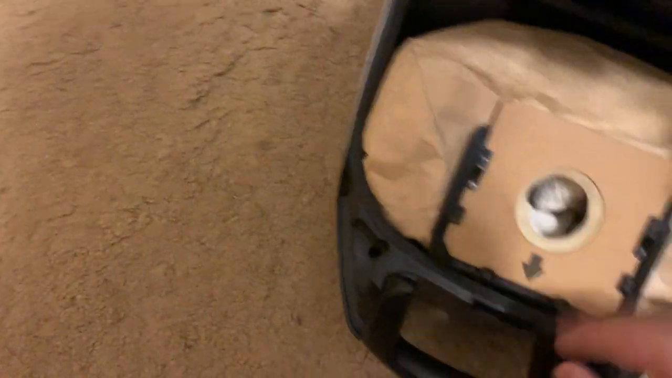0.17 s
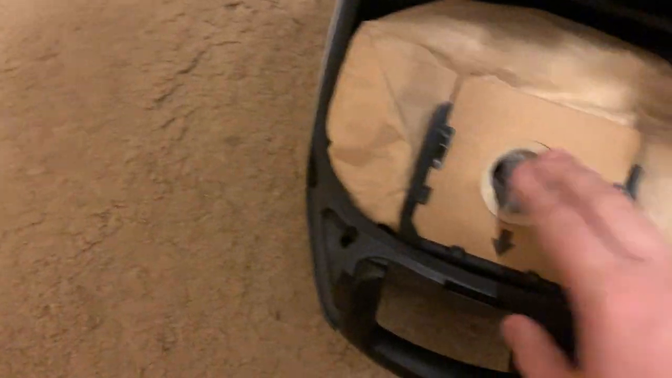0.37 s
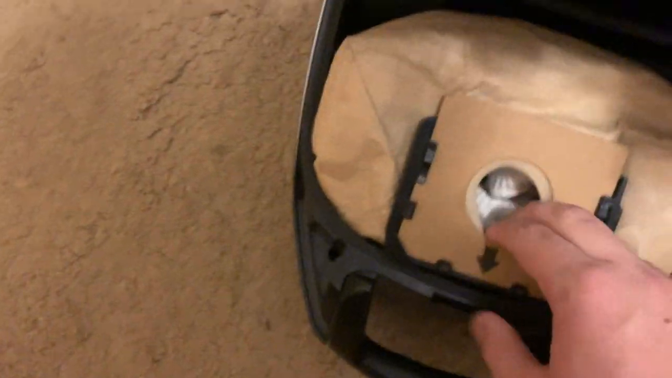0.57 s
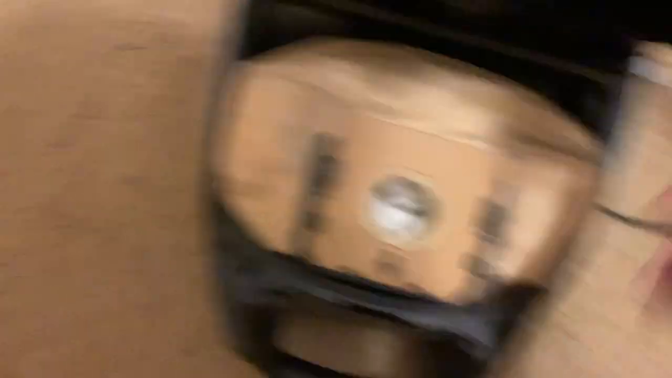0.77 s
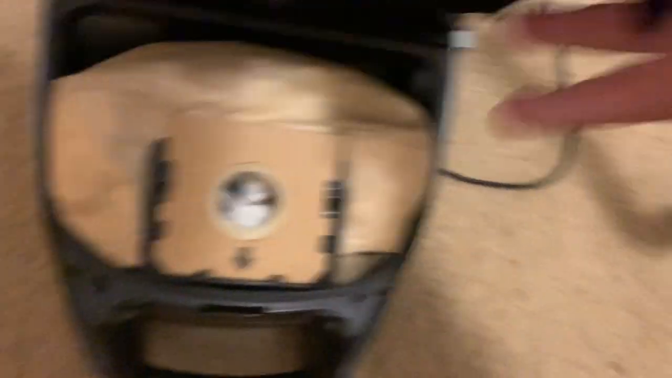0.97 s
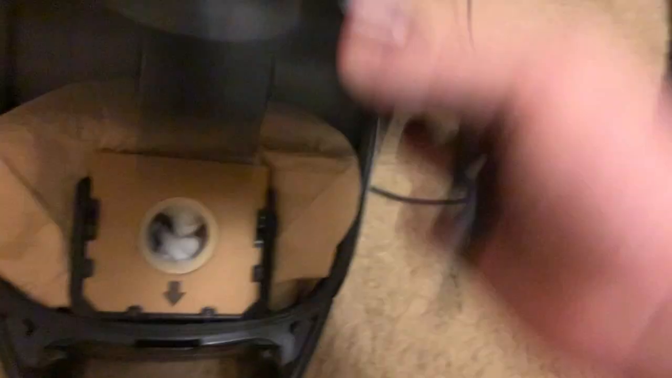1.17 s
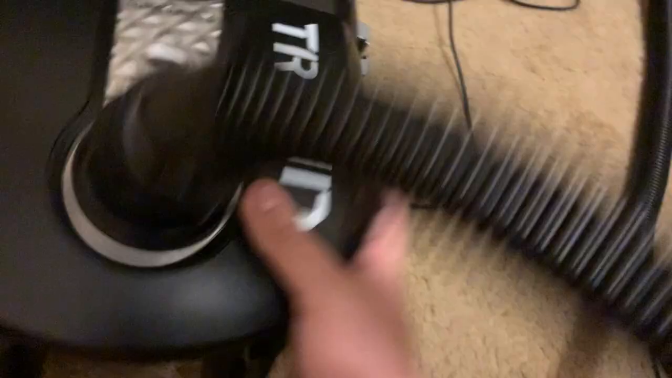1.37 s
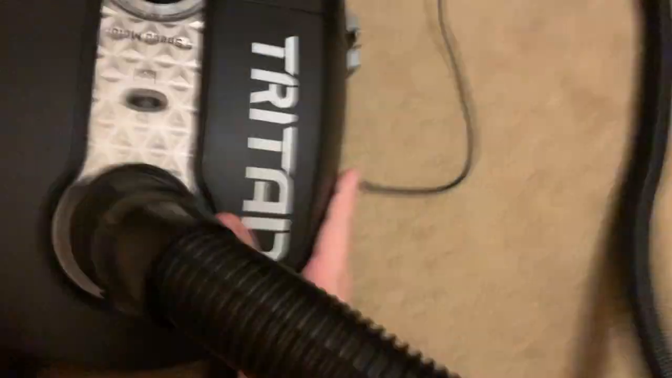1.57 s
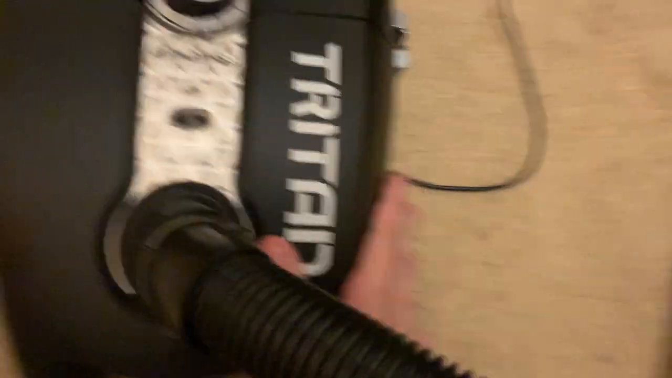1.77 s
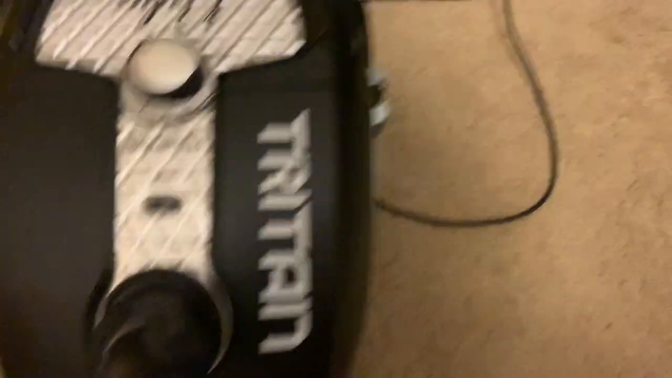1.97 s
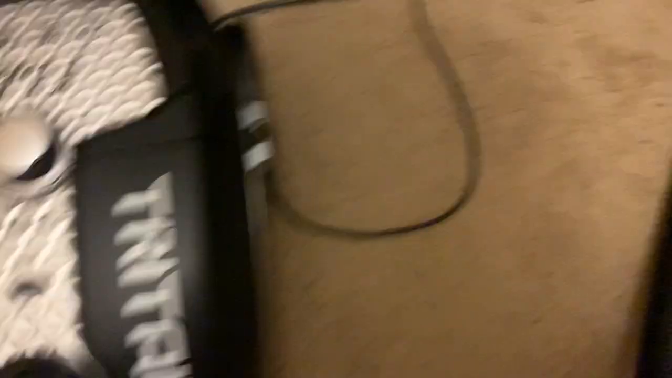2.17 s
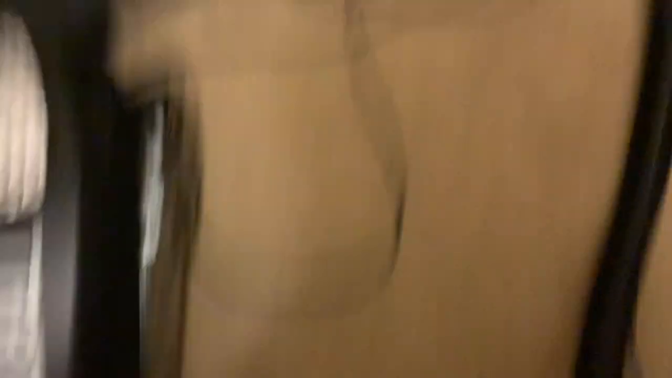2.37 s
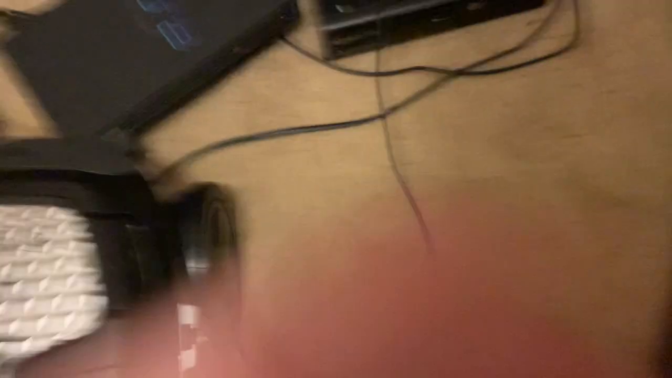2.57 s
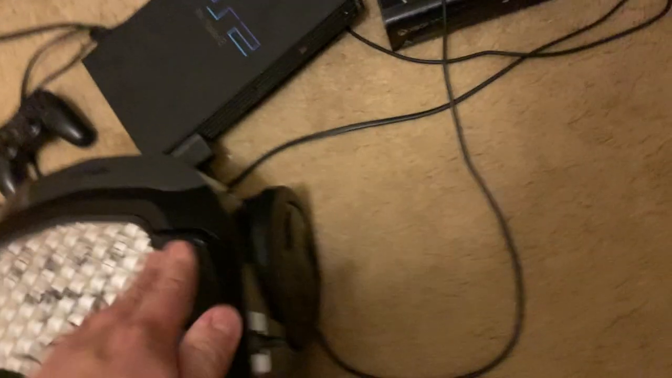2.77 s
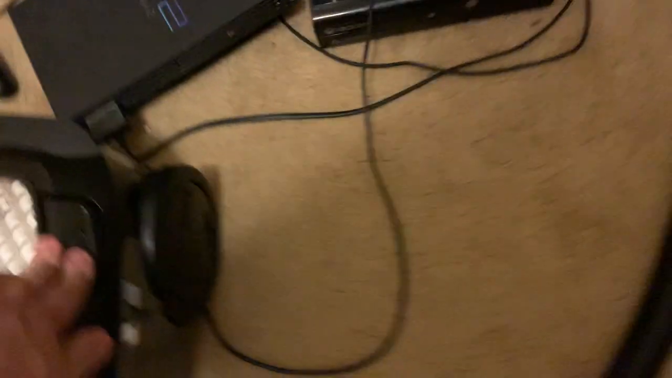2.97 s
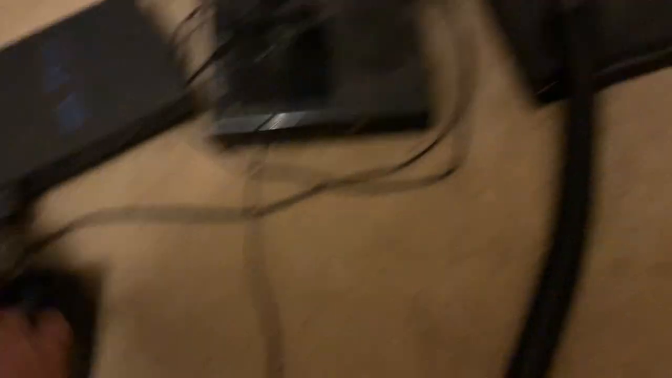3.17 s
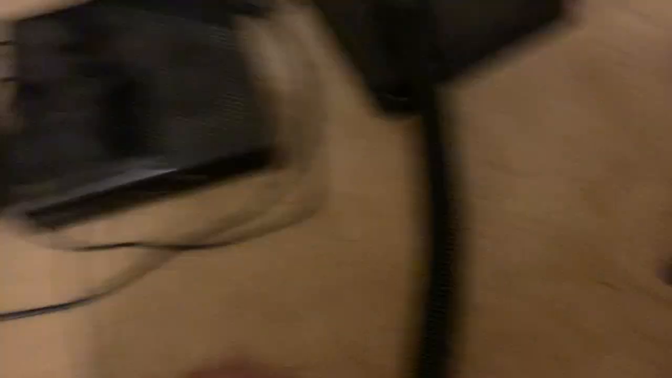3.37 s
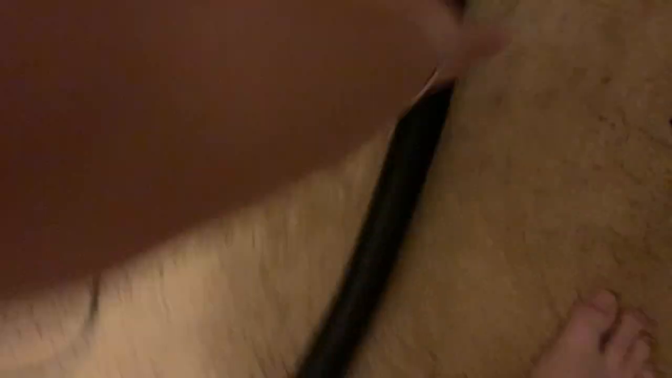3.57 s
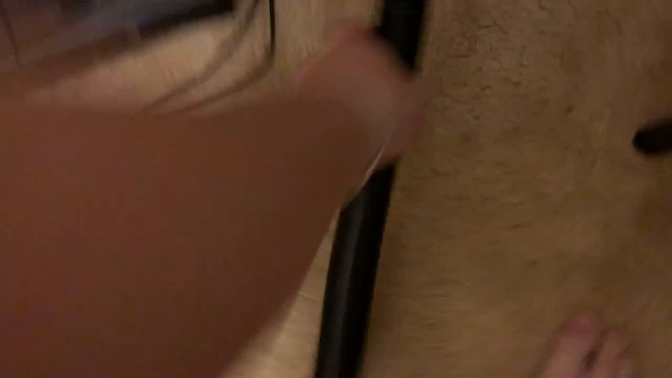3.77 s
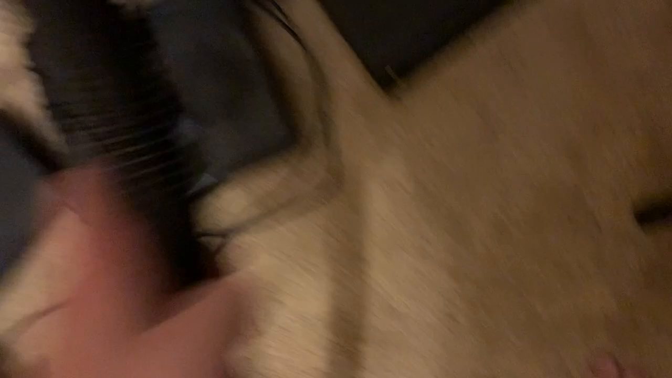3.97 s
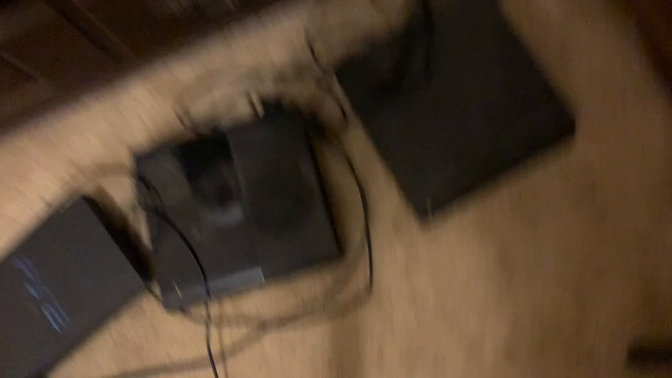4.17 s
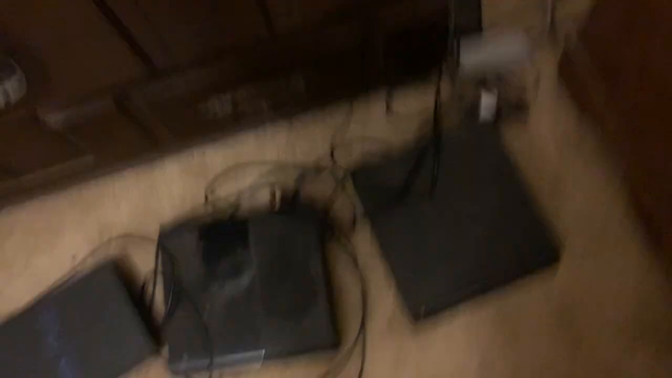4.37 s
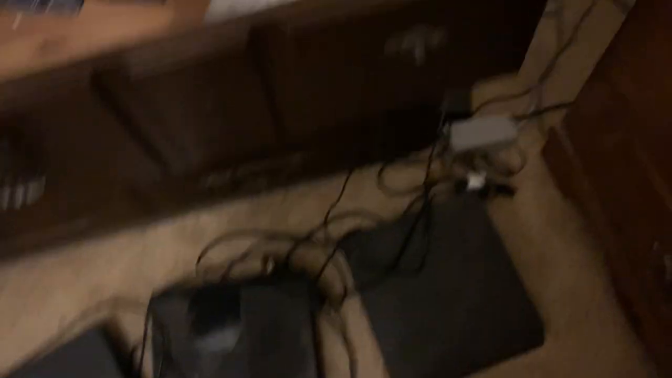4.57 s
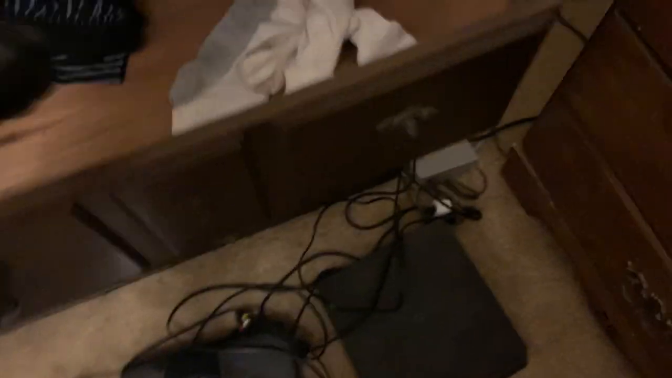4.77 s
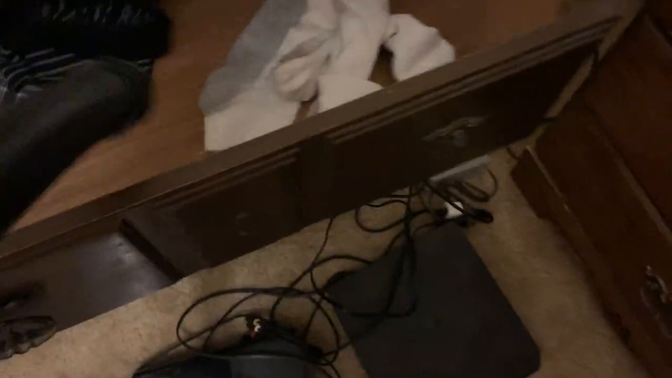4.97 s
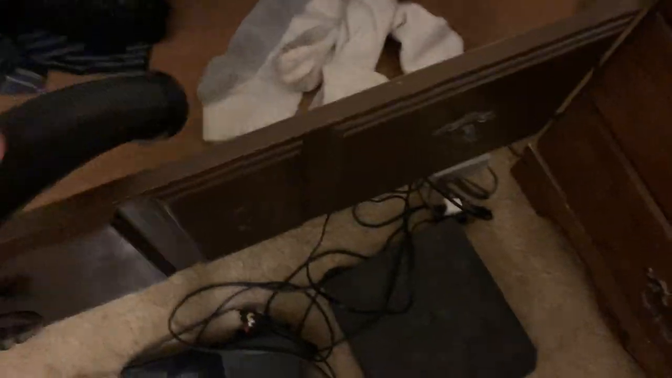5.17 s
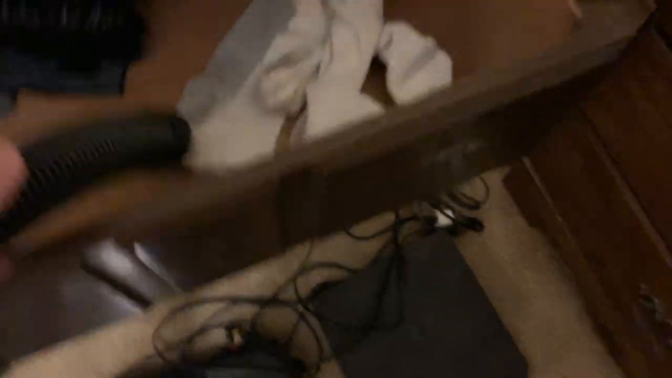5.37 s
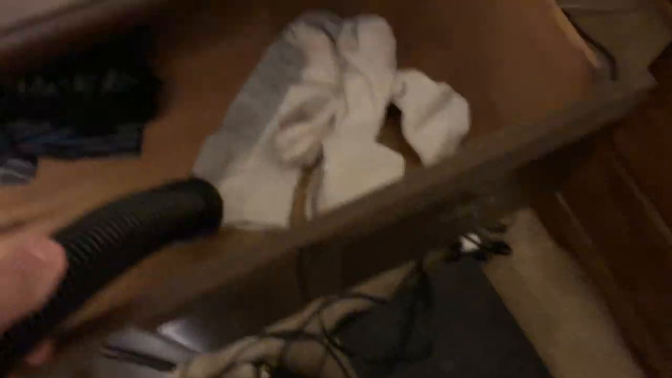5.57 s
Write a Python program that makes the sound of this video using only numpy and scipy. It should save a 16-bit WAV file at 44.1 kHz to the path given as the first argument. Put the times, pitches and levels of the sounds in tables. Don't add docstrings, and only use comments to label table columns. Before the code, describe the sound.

Close handling of a vacuum cleaner: papery taps, hard lid clack, quiet rustles, switch press, then a low hum rising into whining, roaring air.

```python
import sys
import numpy as np
from scipy import signal
from scipy.fft import rfft, irfft, next_fast_len
from scipy.io import wavfile
from scipy.ndimage import map_coordinates

SR = 44100
rng = np.random.default_rng(int(sys.argv[2]) if len(sys.argv) > 2 else 0)


def digitize_waveform(pressure):
    field = np.atleast_2d(pressure).T
    bounded = np.clip(field, -1, 1)
    quanta = np.round(bounded * 32767).astype(np.int16)
    wavfile.write(sys.argv[1], SR, quanta)


def gain_from_db(level_db):
    decades = np.asarray(level_db, float) / 20
    return 10 ** decades


N = 248283

# time_s, speed_rev_per_s
SHAFT_SPEED = [(3.4, 5), (3.7, 50), (3.92, 96), (4.0, 108), (4.05, 129), (4.2, 187), (4.36, 242),
               (4.5, 285), (4.62, 309), (4.8, 342), (5.05, 386), (5.15, 406), (5.33, 438), (5.45, 457),
               (5.63, 479)]
# order, level_db, best_rev_per_s, loss_db_per_octave2
SHAFT_ORDERS = [(1, -46, 215, 60), (1, -42, 270, 400), (1, -48, 315, 500), (8, -47, 270, 1500),
                (8, -50, 420, 1500), (8, -49, 358, 3000), (8, -40, 466, 2200), (16, -61, 182, 500),
                (16, -46, 226, 700), (16, -51, 262, 5000), (16, -45, 288, 6000), (16, -41, 301, 5000),
                (16, -41, 313, 5000), (16, -38, 330, 3000), (16, -45, 378, 3000), (16, -46, 402, 5000),
                (16, -41, 446, 3000), (24, -60, 103, 500), (24, -70, 120, 500), (24, -59, 187, 1500),
                (24, -61, 225, 900), (24, -50, 275, 500), (24, -54, 300, 3000), (24, -46, 472, 3000),
                (24, -49, 358, 3000), (32, -50, 412, 4000), (32, -57, 250, 300), (32, -58, 340, 600),
                (40, -70, 195, 200), (40, -64, 285, 300)]
# order, level_db, best_rev_per_s, loss_db_per_octave2
VANE_EDDIES = [(5.5, -52, 215, 600), (11, -56, 190, 500), (9.1, -47, 262, 1500), (12, -43, 278, 400),
               (8.3, -46, 290, 1500), (10.8, -47, 300, 1200), (7.4, -45, 400, 1000), (11.2, -45, 350, 1500),
               (13.8, -49, 265, 1500), (14, -43, 313, 5000), (9.8, -49, 315, 500), (12.5, -43, 320, 1200),
               (10, -42, 348, 1500), (6.4, -44, 340, 4000), (12.6, -43, 368, 700), (6.5, -43, 372, 1500),
               (18.6, -45, 370, 600), (10.1, -46, 380, 5000), (10.3, -41, 408, 2000), (9.1, -38, 430, 700),
               (6.8, -41, 432, 500), (9.5, -35, 470, 500), (13.6, -40, 472, 1500), (19.3, -43, 435, 2000)]
# mains_multiple, level_db
CURRENT_HARMONICS = [(1, 2), (2, -12), (3, -12.5), (4, -31), (5, -30), (9, -19.5), (10, -11)]
# freq_hz, density_db
ROAR_SPECTRUM = [(76, -38), (130, -10), (210, -2), (500, -10), (1040, -13), (1200, -14), (3000, -13),
                 (5500, -120)]
# freq_hz, density_db
HISS_SPECTRUM = [(900, -32), (1700, -59), (2800, -5), (4200, 2), (5200, -3.5), (6500, 0), (9000, -5),
                 (11500, -9), (13500, -14), (16000, -21.5)]
# freq_hz, width_hz, level_db
HOSE_MODES = [(210, 29, -1), (252, 27, -2.5), (334.6, 12, -2.5), (392, 14, 1.5), (455.5, 16.6, 6),
              (561, 40, 1.5), (645, 26, 2), (869, 45, 0), (912, 35, 1.5), (992.5, 11.6, 5.5)]

# start_s, snap_db, ring_db, knock_db
SWITCH_HITS = [
    (2.8833, -70.5, -40.5, -42),
    (2.8883, -53.5, -31.5, -33),
    (2.9207, -35.5, -35.5, -31.5),
    (2.9344, -54, -39.5, -31.5),
    (3.0674, -43, -53, -38),
    (3.0948, -43.5, -46, -30),
    (3.0974, -38.5, -25.5, -24),
]
# start_s, snap_db, ring_db, knock_db
LID_HITS = [(1.4715, -33, -59.5, -60), (1.4983, -48, -44, -62), (1.5135, -17.5, -34.5, -64),
            (1.5539, -12, -22, -28), (1.568, -32, -34, -35), (1.5734, -11.5, -18.5, -18),
            (1.6506, -1.5, -17, -19.5), (1.9324, -54, -55, -41.5), (1.9385, -45, -67, -53),
            (1.9884, -47, -50, -50), (2.0654, -54, -59.5, -49), (2.0822, -44, -56, -58),
            (3.4195, -47.5, -53.5, -47), (3.6621, -39.5, -70, -44.5), (3.7329, -48, -49, -45),
            (3.901, -65, -46.5, -50.5), (4.0637, -46, -54, -51), (4.0894, -50, -47, -42.5),
            (4.285, -62, -52, -57)]
# start_s, snap_db, ring_db, knock_db
BAG_HITS = [(.389, -53, -47.5, -41), (.4179, -41, -42, -30), (.4334, -39.5, -46, -25.5),
            (.4377, -32.5, -31, -32), (.4424, -55, -51, -35), (.6144, -47, -66, -33),
            (.6198, -44, -41, -49), (.6293, -45, -42, -45), (.8244, -40, -45, -33), (.8298, -29, -41, -33),
            (.836, -29.5, -30, -30), (.8609, -26.5, -29, -34.5), (.9652, -39.5, -43, -58.5),
            (.9877, -34, -62, -69), (1.0161, -33.5, -45, -43), (1.0445, -45, -45, -66),
            (1.187, -53.5, -43, -55.5), (1.2007, -42, -38, -42.5), (1.219, -44, -49, -54.5),
            (1.2494, -45.5, -42, -39)]
# freq_hz, width_hz, level_db
SWITCH_MODES = [(916, 200, 6), (1650, 146, 0.5), (1930, 28, 6), (2640, 160, -8)]
# freq_hz, width_hz, level_db
LID_MODES = [(1080, 15, -8.5), (1252, 183, 7.5), (2023, 31, -9), (1392, 35, -3), (6600, 730, -19.5),
             (1600, 32, -1)]
# freq_hz, width_hz, level_db
COLLAR_MODES = [(1117, 32, 8.5), (1550, 225, 3.5), (2100, 390, 0.5), (2634, 33, -0.5), (3003, 62, 0)]
# freq_hz, width_hz, level_db
CHAMBER_MODES = [(287, 82, 6.5), (724, 300, -4.5)]
# freq_hz, density_db
SNAP_SPECTRUM = [(1500, -7), (2500, -9.5), (3800, -2), (6500, -8), (9000, -10.5), (12000, -14),
                 (16000, -30)]
HEAD_BLOW = [
    [18.5],
    [15],
    [10],
]
# start_s, peak_db, freq_hz, cycles_to_peak
RESONANT_BLOWS = [(.4185, -43, 770, 2), (.432, -33.5, 995, 1.8), (.434, -23, 315, 0.67), (.613, -41, 790, 1.2),
                  (.621, -37.5, 527, 0.98), (.630, -34, 1110, 0.79), (.835, -27, 1435, 5), (.836, -36, 720, 6),
                  (.860, -41, 1100, 2.4), (.862, -42, 2000, 3.5), (.969, -45, 1820, 5.5),
                  (1.018, -41, 1320, 1.9), (1.556, -22, 1520, 3.8), (1.568, -11, 1304, 2.5),
                  (1.573, -19.5, 710, 1.8), (1.577, -32, 300, 3.7), (1.6505, -4, 1348, 2.1),
                  (1.655, -13.5, 680, 1.7), (1.665, -29, 1280, 4.6), (1.672, -31, 586, 3.4),
                  (1.930, -39.5, 758, 1.6), (1.944, -48, 825, 2.6), (1.986, -42, 960, 3),
                  (2.064, -56, 950, 2.6), (2.275, -30, 141.6, 0.78), (2.269, -46.5, 1440, 4.7),
                  (2.41, -54, 1200, 6), (2.505, -57.5, 1105, 4.7), (2.8875, -33, 998, 1.4),
                  (2.893, -32.5, 496, 1.4), (2.931, -28, 423, 0.79), (2.943, -29.5, 465, 1.7),
                  (3.096, -18.5, 1630, 3.1), (3.101, -28.5, 610, 1.3), (3.106, -29, 335, 3.5),
                  (3.110, -34, 1730, 4.4), (3.124, -38, 1710, 4)]
# start_s, peak_db, freq_hz, cycles_to_peak
EDGE_TICKS = [(.377, -62, 6800, 6), (.390, -51, 6350, 4), (.391, -48, 2340, 2.3), (.838, -33, 3400, 4.8),
              (.864, -35, 8150, 10), (.9875, -31.5, 5830, 7.5), (.989, -44, 3200, 5.4),
              (1.016, -35.5, 3210, 4), (1.017, -45, 7470, 8), (1.556, -20.5, 3440, 8.1),
              (1.571, -26, 3130, 9.5), (1.651, -17, 6380, 8), (1.513, -31.5, 3530, 8),
              (1.513, -30.5, 1940, 5), (1.9375, -42, 6500, 3), (1.9375, -41, 9700, 4.8),
              (1.987, -53, 3280, 3.1), (2.081, -53, 5400, 3.2), (2.081, -55.5, 3370, 3.7),
              (2.920, -38, 7250, 8), (2.920, -47, 2940, 5.1), (3.418, -49, 2210, 1.6),
              (3.53, -60, 6400, 55), (3.55, -60, 7000, 25), (1.096, -56, 7500, 4), (2.552, -63, 7100, 5.4),
              (3.648, -61, 7400, 7.3), (3.662, -47, 5540, 7.4), (3.663, -54, 6800, 8),
              (3.733, -54, 3080, 10), (4.064, -50, 3500, 6)]
# start_s, level_db, pitch_hz
LOW_THUDS = [(.13, -57, 60), (0.262, -59, 70), (1.029, -44, 55.6), (1.91, -49, 55), (2.43, -46.5, 59.6),
             (3.89, -41.5, 55), (4.63, -45, 55), (1.36, -27, 153), (1.385, -28, 53.3), (1.449, -24, 119),
             (1.602, -25.5, 54), (1.626, -15.5, 120), (1.687, -16.5, 156.8), (2.014, -39.5, 73),
             (2.284, -28, 54.2), (3.157, -24.5, 88), (3.179, -28, 50.4), (3.24, -31, 62),
             (3.338, -36.5, 53.7), (3.489, -44, 61.3), (3.987, -30, 64.6)]
# start_s, push_db, tick_db
PHONE_TAPS = [
    (2.267, -37, -60.5),
    (2.278, -36, -49.5),
    (2.476, -36, -57.5),
    (2.508, -43, -74),
    (2.548, -40.5, -77.5),
]

# start_s, length_s, scrape_db, paper_over_scrape_db
RUB_STROKES = [(0, 0.072, -52, -8.5), (0.37, 0.045, -67, -12), (.585, .03, -72, -10),
               (2.87, .025, -62.5, -19), (3.022, 0.056, -67, -17), (0.4, 0.21, -72, -35),
               (0.61, 0.028, -54.5, -2.5), (0.825, 0.053, -45, -32), (0.973, 0.078, -57, -27),
               (1.08, 0.25, -55, -11.5), (1.298, 0.17, -59.5, -13), (1.424, 0.14, -57, -7),
               (1.52, 0.25, -50, -3.5), (1.74, 0.1, -55, -9), (1.835, 0.15, -63, 6),
               (2.003, 0.17, -63.5, -13.5), (2.193, 0.047, -80, 11), (2.263, 0.021, -52, 0.5),
               (2.35, 0.018, -75.5, 10.5), (2.305, 0.11, -78, 3.5), (2.401, 0.029, -54.5, -18.5),
               (2.504, 0.012, -60.5, -1.5), (2.536, 0.024, -74.5, 8.5), (2.635, .03, -81, -12.5),
               (2.66, 0.033, -54, -15.5), (2.715, 0.3, -80.5, -7), (2.896, 0.13, -54.5, -21),
               (3.072, 0.091, -42.5, -16.5), (3.184, 0.2, -61.5, -20.5), (3.518, 0.13, -61, -6),
               (3.394, 0.085, -64, -18), (3.647, 0.26, -60, -16.5), (3.93, 0.18, -55, -20),
               (4.106, 0.39, -45.5, -20)]
# time_s, level_db
HAND_WEIGHT = [(0, -48.5), (.15, -60), (.36, -55.5), (.45, -47), (.67, -65), (1.0, -52), (1.29, -51),
               (1.57, -40.5), (1.68, -27), (1.86, -57.5), (2.2, -57), (2.45, -56.5), (2.72, -54),
               (2.94, -67.5), (3.1, -47.5), (3.53, -52.5), (3.75, -49), (4.2, -49)]
# time_s, gain_db
CASING_UPPER_DIP = [(2.3, -5.5), (2.42, -16), (2.6, -14), (2.8, 1.5)]
# freq_hz, density_db
CARPET_SPECTRUM = [(20, -51), (45, -5), (70, -4.5), (110, -6), (170, -13), (300, -52.5)]
# freq_hz, density_db
CASING_SPECTRUM = [(90, -36.5), (170, -4), (300, -2), (450, -8), (700, -16.5), (1100, -49.5)]
# freq_hz, density_db
SCRAPE_SPECTRUM = [(400, -44.5), (750, 4.5), (1300, 1), (2200, -1.5), (3500, -7.5), (5000, -38.5)]
# freq_hz, density_db
PAPER_SPECTRUM = [(2500, -32), (4000, -2.5), (6500, -5.5), (10000, -14), (13000, -17), (16000, -32)]

# freq_hz, t60_s
ROOM_T60 = [(150, 0.45), (1000, 0.32), (4000, 0.27), (12000, 0.14)]
# time_s, phase_rad
BASS_STEER = [(0, .5), (1.4, .55), (1.6, .75), (2.2, .6), (2.27, 2.06), (2.36, -1.5), (2.42, 2.6),
              (2.53, 3.7), (2.56, 2.5), (2.62, .8), (2.8, 0), (5.63, 0)]
# freq_hz, likeness_0_to_1
LIKENESS = [(400, 1), (700, 0.96), (1300, 0.13), (2600, 0.069), (3600, 0.48), (4700, 0.98), (7000, 0.88),
            (16000, 1)]

CLACK_ATTACK_S, CLACK_T60_S, CLACK_LEAD_DB = 0.0025, 0.058, -10.5
TONE_SPREAD = np.array([[1], [0.19]])
KNOCK_SPREAD = np.array([[1], [0.81]])


def unit(x):
    return x / np.sqrt(np.mean(x ** 2) + 1e-20)


def along(points, hz):
    f, v = np.transpose(points)
    return np.interp(np.log(hz + 1), np.log(f + 1), v)


def curves(rows):
    s, *cols = np.transpose(rows)
    return [np.interp(np.arange(N) / SR, s, c) for c in cols]


def wobble(rate_hz):
    knots = rng.standard_normal(int(N * rate_hz / SR) + 4)
    return map_coordinates(knots, [np.arange(N) * rate_hz / SR])


def filtered(x, response):
    m = next_fast_len(N + SR // 2)
    return irfft(rfft(x, m) * response(np.fft.rfftfreq(m, 1 / SR)), m)[..., :N]


def noise(spectrum, grain_db=0, rate_hz=60):
    white = rng.standard_normal((2, N)) * gain_from_db(grain_db * wobble(rate_hz))
    return unit(filtered(white, lambda hz: gain_from_db(along(spectrum, hz))))


def modes(peaks):
    def response(hz):
        total = 0
        for k, (centre, width, db) in enumerate(peaks):
            resonance = 1j * hz * width / (centre * centre - hz * hz + 1j * hz * width)
            total = total + (-1) ** k * gain_from_db(db) * resonance
        return total
    return response


def upper(x, knee_hz):
    return filtered(x, lambda hz: 1 / (1 + (knee_hz / (hz + 1)) ** 6))


def resonance_gain(speed, level_db, best, loss_db):
    return level_db - loss_db * np.log2(speed / best) ** 2


def mains_hum():
    full_s, soft_db = 3.65, -11
    current_db, = curves([(full_s, soft_db), (full_s + 0.015, 0)])
    mains = 2 * np.pi * 120 * np.arange(N) / SR
    hum_level = gain_from_db(-44.5 + current_db + 2.2 * wobble(12))
    hum = 0
    for k, db in CURRENT_HARMONICS:
        hum = hum + gain_from_db(db + 1.2 * (k > 1) * wobble(16)) * np.sin(k * mains + k)
    buzz_level = gain_from_db(-55.5 + current_db + 1.1 * wobble(25.7))
    buzz = buzz_level * np.sin(10 * mains + 2.1 * wobble(110))
    return hum_level * hum + buzz


def shaft_tones(speed):
    shaft = 2 * np.pi * np.cumsum(speed) / SR
    out = np.zeros(N)
    for k, db, best, loss_db in SHAFT_ORDERS:
        level_db = resonance_gain(speed, db + 4, best, loss_db) + 3.3 * wobble(23)
        out += gain_from_db(level_db) * np.sin(k * shaft + min(k / 24, .7) * wobble(75))
    return out


def vane_eddies(speed):
    climb = 0.2
    phase = 2 * np.pi * np.cumsum(speed ** (1 + climb)) / SR
    out = np.zeros(N)
    for k, db, best, loss_db in VANE_EDDIES:
        level_db = resonance_gain(speed, db, best, loss_db) + 3 * wobble(50)
        out += gain_from_db(level_db) * np.sin(k * phase / best ** climb + 1.2 * wobble(140))
    return out


def fan_air(speed):
    octaves = np.log2(speed / 300)
    roar = noise(ROAR_SPECTRUM, grain_db=1.5, rate_hz=25)
    roar += unit(filtered(noise(ROAR_SPECTRUM), modes(HOSE_MODES)))
    hiss = noise(HISS_SPECTRUM, grain_db=0.64, rate_hz=57)
    hiss += (gain_from_db(15.5 * octaves) - 1) * upper(hiss, 8000)
    throb = 1 + 0.069 * np.sin(2 * np.pi * 120 * np.arange(N) / SR)
    air = gain_from_db(-39.5 + 10 * octaves) * roar
    air += gain_from_db(-41.5 + 11.5 * octaves) * throb * hiss
    air *= gain_from_db(-21 * np.minimum(octaves, 0) ** 2)
    side_tone = np.sin(16 * 2 * np.pi * np.cumsum(speed) / SR)
    air[1] += gain_from_db(resonance_gain(speed, -28, 304, 3500)) * side_tone
    return air


def motor():
    speed, = curves(SHAFT_SPEED)
    on, = curves([(3.4, 0), (3.5, 1)])
    tones = mains_hum() + shaft_tones(speed) + vane_eddies(speed)
    return on * (tones * TONE_SPREAD + fan_air(speed))


def hits(rows, shell, attack_s, t60_s, tilt_db, lead_db):
    lead_n = SR // 50
    t = np.arange(-lead_n, SR // 7) / SR
    after = np.maximum(t, 0)
    edge = gain_from_db(15 - 60 * after / 0.0075)
    tail = gain_from_db(-60 * after / (t60_s * np.array([[1], [.8], [1.3]])))
    strike = tail + edge * np.array([[1], [.7], [.4]])
    rub_in = gain_from_db(lead_db - 60 * abs(t) / 0.039)
    shape = strike * (1 - np.exp(-after / attack_s)) + rub_in
    layers = np.zeros((4, 2, N))
    for s, snap_db, ring_db, knock_db in rows:
        start, at = round((s + t[0]) * SR), round(s * SR)
        burst = gain_from_db([[snap_db], [ring_db + 12], [knock_db + 16]]) * shape
        grains = rng.standard_normal((3, 2, len(t)))
        layers[:3, :, start:start + len(t)] += burst[:, None] * grains
        layers[:3, :, at] += burst[:, [lead_n + 88]] * gain_from_db(HEAD_BLOW)
        layers[3, :, at] += gain_from_db(knock_db + 37)
    first = round(rows[0][0] * SR) - SR // 10
    last = round(rows[-1][0] * SR) + SR // 2
    m = next_fast_len(last - first)
    hz = np.fft.rfftfreq(m, 1 / SR)
    bright = gain_from_db(along(SNAP_SPECTRUM, hz) + tilt_db * np.log2(1 + hz / 5000))
    push = modes([(80, 90, -2), (180, 110, -3)])(hz)
    colours = np.array([bright, modes(shell)(hz), modes(CHAMBER_MODES)(hz), push])
    spectrum = (rfft(layers[..., first:last], m) * colours[:, None]).sum(axis=0)
    return np.pad(irfft(spectrum, m), ((0, 0), (first, N - first - m)))


def power_switch():
    return hits(SWITCH_HITS, SWITCH_MODES, CLACK_ATTACK_S, CLACK_T60_S, 11, CLACK_LEAD_DB)


def lid_clacks():
    return hits(LID_HITS, LID_MODES, CLACK_ATTACK_S, CLACK_T60_S, -5, CLACK_LEAD_DB)


def bag_pats():
    return hits(BAG_HITS, COLLAR_MODES, 0.0034, 0.035, 5.5, -17.5)


def blows(rows):
    out, t = np.zeros(N + SR), np.arange(SR // 12) / SR
    for s, db, hz, cycles in rows:
        u = t * hz / cycles
        swing = u * np.exp(1 - u) * np.sin(2 * np.pi * hz * t)
        out[round(s * SR):][:len(t)] += gain_from_db(db) * swing
    return out[:N]


def thuds():
    out, t = np.zeros(N + SR), np.arange(SR // 8) / SR
    for s, db, hz in LOW_THUDS:
        swing = t * hz * np.exp(1 - 1.5 * t * hz) * np.sin(2 * np.pi * hz * t)
        out[round(s * SR):][:len(t)] += gain_from_db(db + 2.5) * swing
    return out[:N]


def smeared(x, cycles=1.974, knee_hz=60):
    def response(hz):
        lag = cycles * (np.arcsinh(hz / knee_hz) - hz / 4000)
        return np.exp(-2j * np.pi * lag)
    return filtered(x, response)


def taps():
    push, tick = np.zeros((2, N))
    for s, push_db, tick_db in PHONE_TAPS:
        push[round(s * SR)] = gain_from_db(push_db + 43)
        tick[round(s * SR)] = gain_from_db(tick_db + 33)
    case = filtered(push, modes([(98.2, 56, 11), (300, 236, -4)]))
    case += filtered(tick, modes([(2130, 600, -33), (6920, 3840, 5)]))
    return smeared(case)


def rubbing():
    attack_s, t60_s, swell_db = 0.0071, 0.18, 4.5
    t = np.arange(N) / SR
    scrape, paper = gain_from_db(-92.5), gain_from_db(-96)
    for s, length, db, paper_db in RUB_STROKES:
        decay_s = t60_s * min(1, length / 0.094) ** .5
        fall_db = 60 * np.maximum(t - s - length, 0) / decay_s
        stroke = np.clip((t - s) / attack_s + 1, 0, 1) * gain_from_db(db - fall_db)
        stroke *= gain_from_db(-swell_db * np.clip(2 * (t - s) / length - 1, -1, 1) ** 2)
        scrape = scrape + stroke
        paper = paper + gain_from_db(paper_db) * stroke
    plastic = scrape * noise(SCRAPE_SPECTRUM, grain_db=2, rate_hz=70)
    return plastic + paper * gain_from_db(3.5) * noise(PAPER_SPECTRUM, grain_db=1.5, rate_hz=220)


def loading():
    weight_db = curves(HAND_WEIGHT)[0] + 55
    carpet = gain_from_db(-55 + 0.92 * weight_db) * noise(CARPET_SPECTRUM, grain_db=6.5, rate_hz=13)
    casing = noise(CASING_SPECTRUM, rate_hz=22)
    casing += (gain_from_db(curves(CASING_UPPER_DIP)[0]) - 1) * upper(casing, 420)
    return carpet + gain_from_db(-58 + 0.85 * weight_db) * casing


def handling():
    return (loading() + rubbing()) * curves([(4.1, 0.93), (4.5, 0.58)])[0]


def room(x):
    hz, t, z = signal.stft(rng.standard_normal((2, SR // 2)), SR, nperseg=256)
    decay = gain_from_db(-60 * t / along(ROOM_T60, hz)[:, None])
    tail = signal.istft(z * decay, SR, nperseg=256)[1]
    return signal.fftconvolve(x, tail / np.linalg.norm(tail[0]), axes=1)[:, :N]


def scene():
    knocks = smeared(power_switch() + lid_clacks() + bag_pats())
    clean = (blows(RESONANT_BLOWS) + blows(EDGE_TICKS)) * TONE_SPREAD
    bumps = (thuds() + taps()) * TONE_SPREAD
    echo = gain_from_db(-7.5) * room(knocks + gain_from_db(-5) * clean)
    return motor() + knocks * KNOCK_SPREAD + clean + bumps + handling() + echo


def low_pass(x):
    return signal.sosfilt(signal.butter(12, 16970, fs=SR, output="sos"), x)


def record(dry):
    def spread(hz):
        band = np.where(hz < 15900, 1, gain_from_db(-36)) * (hz < 16970)
        turn = np.arccos(np.clip(along(LIKENESS, hz), 0, 1)) / 2
        return band * np.array([np.cos(turn), np.sin(turn)])

    def late(hz):
        return np.exp(1j * np.minimum(0, 4 - 2 * np.pi * hz * 10.6 / SR))

    def bass_band(hz):
        return 1 / (1 + (hz / 2500) ** 4) / (1 + (55 / (hz + 1)) ** 4)

    mid, side = filtered(dry, spread)
    right = filtered(mid - side, late)
    bass = filtered(right, bass_band)
    analytic = signal.hilbert(bass, next_fast_len(N))[:N]
    steered = np.real(analytic * np.exp(1j * curves(BASS_STEER)[0]))
    lean_db, = curves([(1.3, 0), (1.5, 0.5), (1.9, 0.5), (2.1, 0.013)])
    lean = gain_from_db(lean_db * np.array([[1], [-1]]))
    return low_pass(lean * np.array([mid + side, right - bass + steered]))


dry = scene()
out = record(dry)
digitize_waveform(out)
```